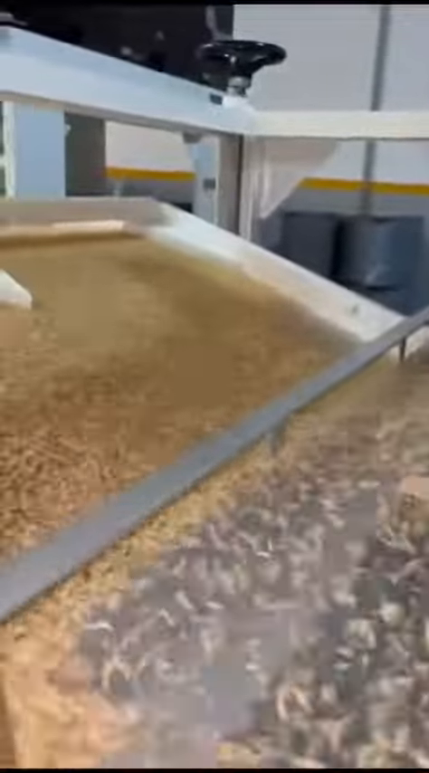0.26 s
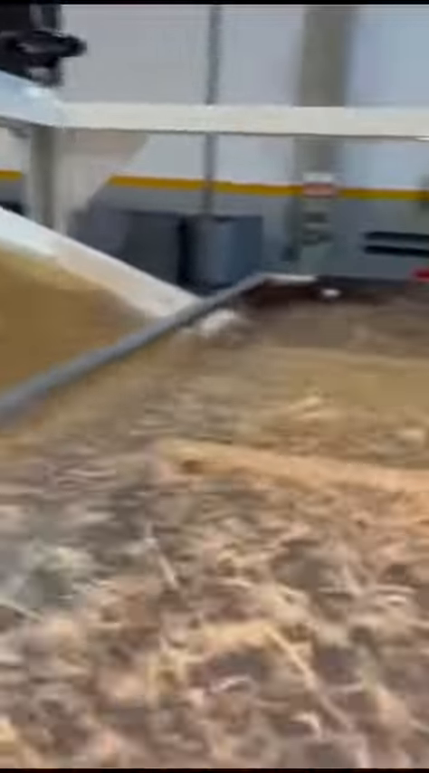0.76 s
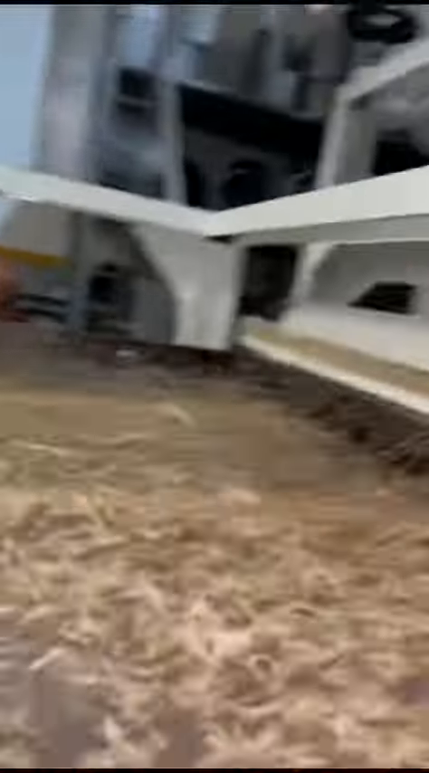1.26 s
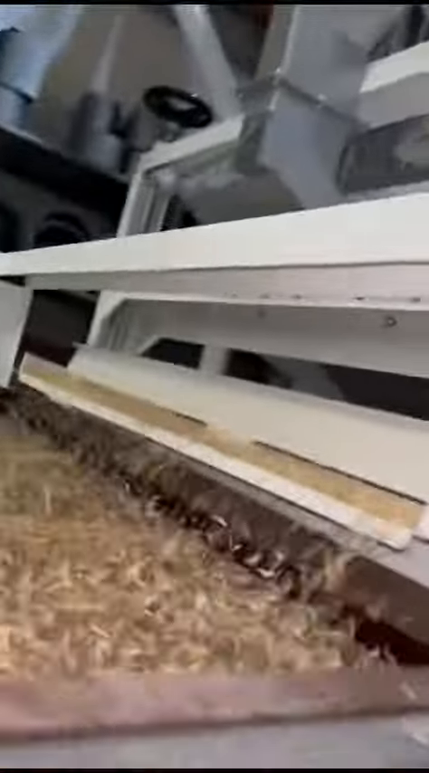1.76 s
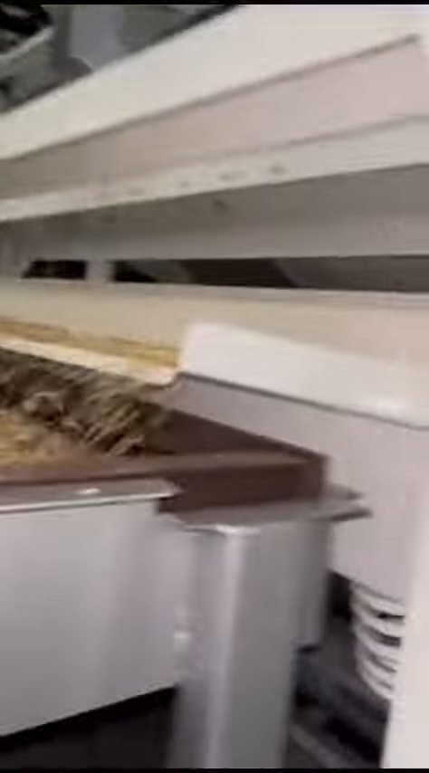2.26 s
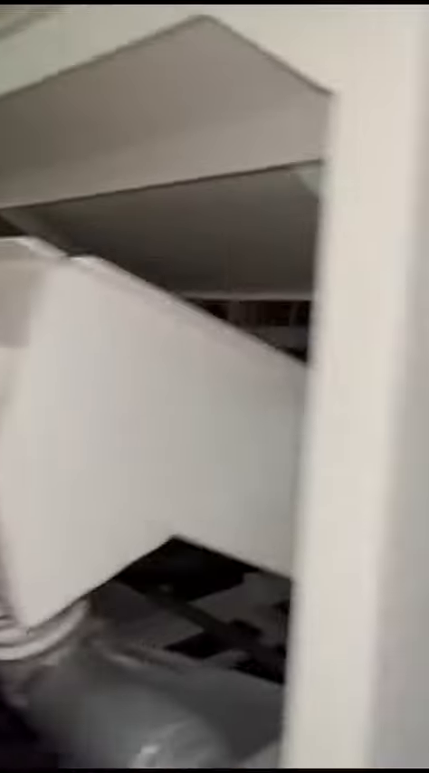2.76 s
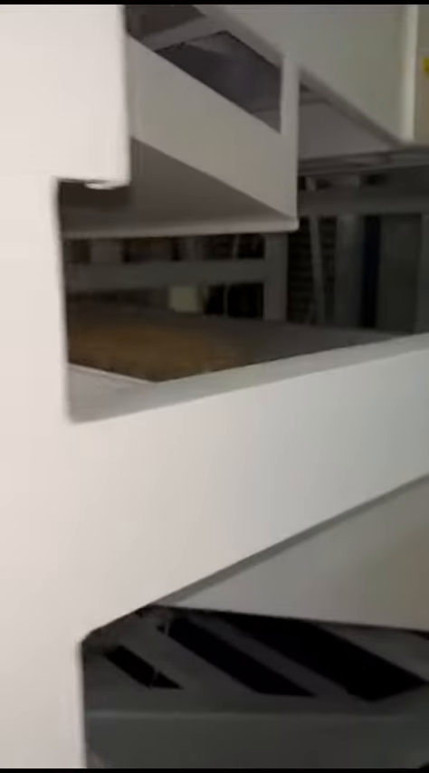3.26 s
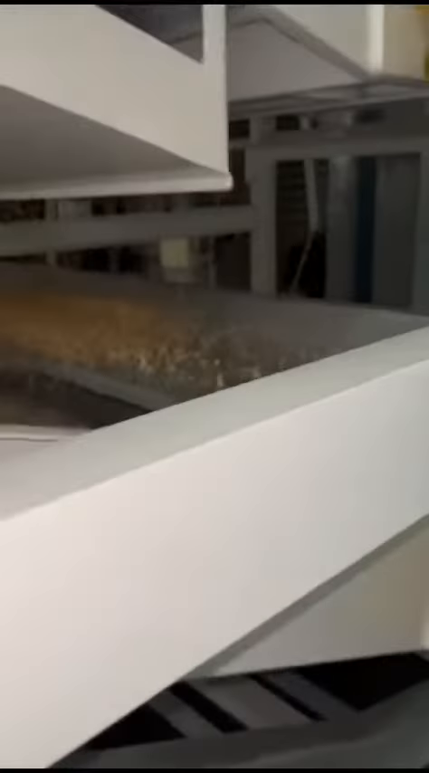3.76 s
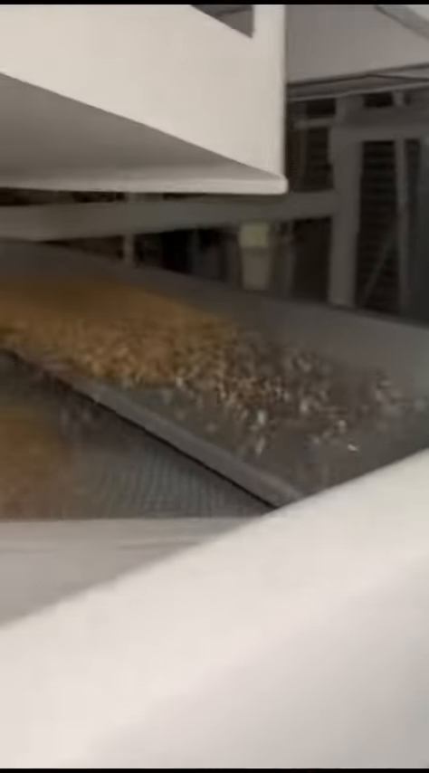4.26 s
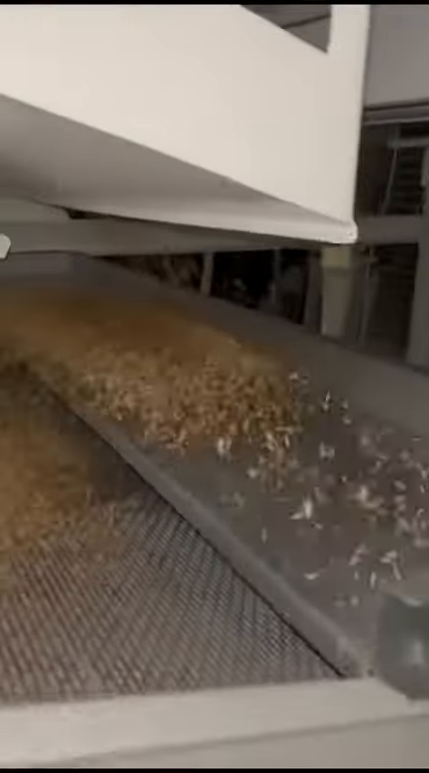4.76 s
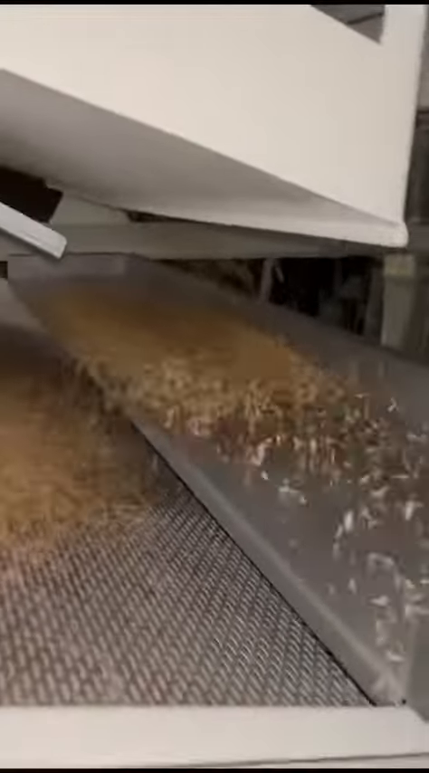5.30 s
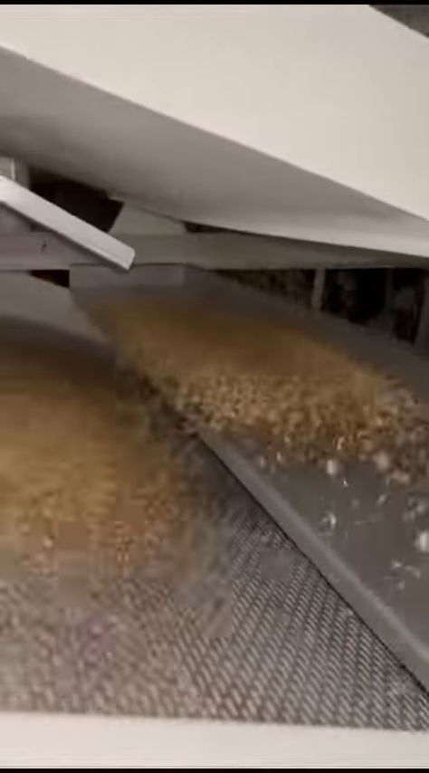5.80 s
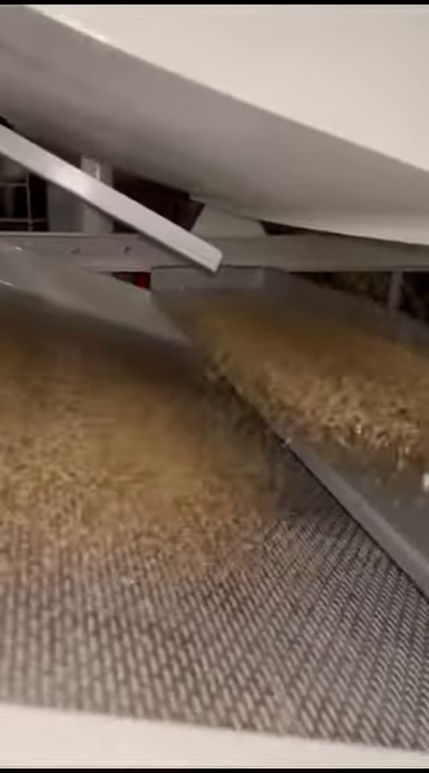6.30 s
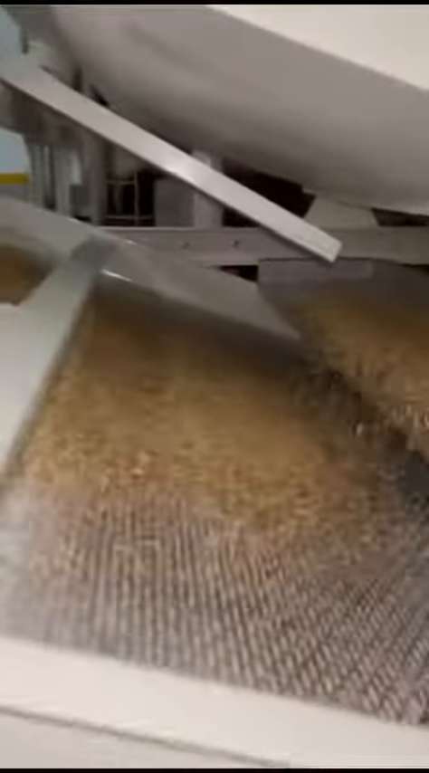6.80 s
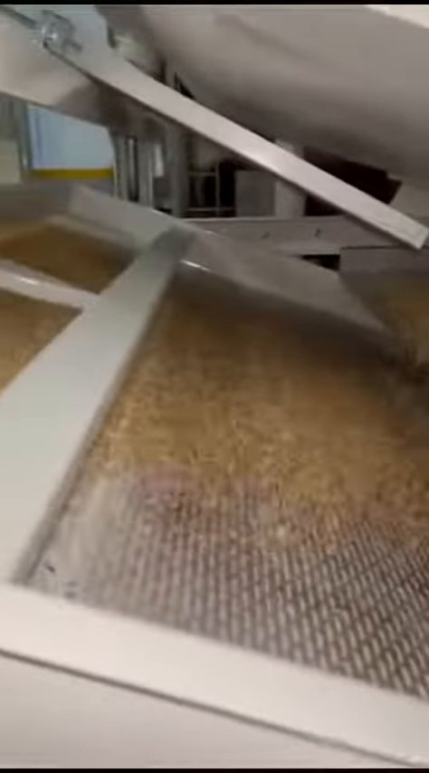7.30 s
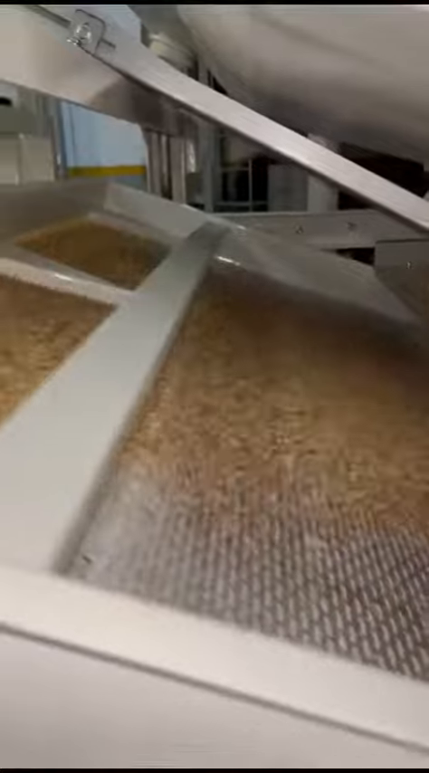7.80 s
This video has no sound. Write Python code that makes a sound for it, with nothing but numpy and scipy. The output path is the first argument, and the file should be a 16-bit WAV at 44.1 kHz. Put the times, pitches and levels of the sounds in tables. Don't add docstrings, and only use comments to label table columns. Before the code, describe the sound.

Continuous heavy machine noise, heard close by on a phone carried past vibrating decks. Kernels rain on wire mesh in a rapid shiver over a droning hum and boxy roar. Loose metal knocks cluster in the first second, then become sparse. The sound dips around the middle as the phone passes between decks, then fills out beside the lower screen, with short, dull rubbing groans from a belt.

```python
import sys
import numpy as np
from scipy import signal
from scipy.fft import rfft, irfft
from scipy.io import wavfile
from scipy.ndimage import uniform_filter1d

SR = 44100
rng = np.random.default_rng(int(sys.argv[2]) if len(sys.argv) > 2 else 0)


def generate_wav(sig):
    pcm = np.round(np.clip(np.atleast_2d(sig).T, -1, 1) * 32767).astype(np.int16)
    wavfile.write(sys.argv[1], SR, pcm)


def decibels_to_gain(level_db):
    exponent = np.asarray(level_db, float) / 20
    return 10 ** exponent


N = 355005
TIME = np.arange(N) / SR
FREQ = np.fft.rfftfreq(N, 1 / SR)

STROKE_HZ = 16.466
BELT_HZ, BELT_WIDTH_HZ = 637, 60

# time_s, third_multiple_db, seventh_multiple_db
STANDING_WAVES = [(0, -39, -40), (.8, -38, -40), (1.5, -52, -35), (2.0, -44, -37), (2.7, -43, -37),
                  (3.8, -52, -36), (4.5, -46, -32), (5.1, -53, -33), (6.3, -34, -36), (7.1, -34, -35),
                  (7.6, -36, -32), (8.05, -46, -32)]
# multiple, level_db, gain_over_open_mouth_db
STROKE_MULTIPLES = [(4, -5, 5), (5, 0, -3), (6, 1, 7), (8, 0, 2), (9, 1, 7), (10, -1, 0), (11, -3, 8),
                    (12, -6, 9), (13, -2, 0), (15, -3, 0), (18, -2, 3), (20, 0, 4), (22, -1, 4)]
# freq_hz, density_db
FRAME_SPECTRUM = [(26, -26), (45, -11), (70, -2), (110, 0), (170, 0), (240, -2), (330, -12), (500, -40)]
# freq_hz, density_db
HOLLOW_SPECTRUM = [(180, -30), (250, -6), (330, 0), (390, -.5), (450, -3), (495, -7), (530, -4.5),
                   (620, -12.5), (800, -22), (1100, -45)]
# freq_hz, density_db
PAN_SPECTRUM = [(450, -25), (650, -1), (900, 0), (1200, -3), (1500, -5.5), (1900, -6.5), (2500, -8.5),
                (3500, -16), (5500, -24), (8000, -40)]
# freq_hz, density_db
THROWN_SPECTRUM = [(1500, -30), (3000, -9), (4500, -5), (6500, -1), (9000, -3), (10400, -3.5), (13500, -8),
                   (15000, -9.5), (15700, -9.5), (15850, -50)]
# freq_hz, density_db
SLIDING_SPECTRUM = [(1000, -25), (2000, -5), (2800, 0), (3800, -1.5), (5300, .8), (6200, -6), (9000, -14),
                    (14000, -26), (15900, -50)]
# start_s, blow_db, low_modes_db, high_modes_db
KNOCKS = [(.056, -32, -3, -12), (.189, -28, -4, -10), (.285, -25.5, 9, -10), (.428, -33, -3, -10),
          (.610, -28, -9, -14), (.733, -26, -8, -7), (.784, -28, 5, -10), (.895, -32, -2, -12),
          (1.005, -33, -3, -12), (1.255, -33, -1, -9), (1.825, -35, -2, -10), (2.156, -34, 4, -8),
          (2.629, -34, -6, -4), (3.298, -27.5, 4, 0), (3.433, -36, 0, -8), (3.537, -31, 4, -7),
          (3.598, -33, 1, -5), (3.900, -34, 0, -6), (4.157, -33, 5, -8), (4.574, -33, 1, -3),
          (4.709, -34, 5, -7), (5.370, -35, 3, -8), (5.429, -32, 4, -7), (6.091, -34, 5, -8),
          (6.760, -35, 3, -8), (7.841, -35, 4, -8)]
# freq_hz, width_hz
LOW_MODES = [(570, 70), (880, 100), (1090, 90)]
# freq_hz, width_hz
MID_MODES = [(1720, 110), (1900, 130), (2100, 120), (2380, 140)]
# freq_hz, width_hz
HIGH_MODES = [(2950, 300), (3700, 350), (4250, 350), (4900, 500)]
# start_s, groan_db, hold_s
GROANS = [(2.2, -35.5, .05), (2.83, -35, .05), (3.31, -37, .02), (3.55, -35, .1), (4.1, -36.5, .12),
          (4.58, -36, .02), (4.71, -34.5, .04), (5.36, -34.5, .08), (5.5, -37, .02), (6.0, -33.5, .02),
          (6.1, -33.5, .02), (6.6, -37, .12), (6.75, -35, .06), (7.27, -35, .05), (7.54, -40, .03),
          (8.03, -35, .03)]
# time_s, upper_deck_distance_m, lower_deck_distance_m
PHONE_PATH = [(0, .95, 5), (1.0, 1.05, 4.5), (1.85, 1.15, 4), (2.5, 1.7, 3), (3.15, 2.3, 2.3),
              (3.55, 2.6, 1.6), (3.95, 3.5, 1.6), (4.6, 4, 1.2), (5.5, 4.5, 1.08), (6.3, 5, 1.08),
              (6.7, 5, .95), (7.3, 5, .98), (8.05, 5, .9)]
# rumble_db, hollow_db, rattle_db, sliding_grain_db, thrown_grain_db, throw_depth_db
UPPER_DECK = (-27.6, -25.2, -33.6, -34.6, -40.3, 3.7)
# rumble_db, hollow_db, rattle_db, sliding_grain_db, thrown_grain_db, throw_depth_db
LOWER_DECK = (-27, -25.5, -37.3, -35.3, -37.6, 3.1)
# rumble_db, hollow_db, rattle_db, sliding_grain_db, thrown_grain_db,
# throw_depth_db
MOUTH_GAIN = (.8, 6.9, 1.8, -.2, -.3, .5)
# freq_hz, likeness_0_to_1, right_lead_rad
PORT_LIKENESS = [(0, 1, 0), (150, .998, .17), (500, .96, .85), (900, .8, .75), (1750, .95, 0),
                 (2400, .7, -2.0), (3000, .35, -1.6), (4000, .3, .4), (4700, .25, 3.0), (5200, .45, 4.0),
                 (5900, .97, 3.14)]
# freq_hz, left_minus_right_db
PORT_BALANCE = [(200, .3), (600, -.3), (1100, -2), (1800, -.6), (3200, -1.6), (4500, -.6), (6000, 0)]
# time_s, left_minus_right_db
PHONE_TURN = [
    (0.0, -0.9),
    (1, -.7),
    (2.7, .2),
    (4.5, 0.5),
    (8.05, 0.2),
]


def unit(x):
    return x / np.sqrt(np.mean(x ** 2))


def over_time(table):
    s, *columns = np.transpose(table)
    return [np.interp(TIME, s, column) for column in columns]


def noise():
    return rng.standard_normal((2, N))


def colour(x, spectrum):
    hz, db = np.transpose(spectrum)
    gain = decibels_to_gain(np.interp(np.log(FREQ + 1), np.log(hz), db, -90, -90))
    return unit(irfft(rfft(x) * gain, N))


def ring(x, hz, width_hz):
    return signal.lfilter(*signal.iirpeak(hz, hz / width_hz, fs=SR), x)


def wander(rate_hz):
    k = int(SR / rate_hz)
    held = rng.standard_normal(size=512)[np.arange(N) // k]
    return unit(uniform_filter1d(uniform_filter1d(held, k), k))


def mouth():
    return np.clip(1 - (TIME - .8) / .55, 0, 1)


def levels_at_phone():
    upper_m, lower_m = np.maximum(over_time(PHONE_PATH), .3)
    upper = np.array(UPPER_DECK)[:, None] + np.array(MOUTH_GAIN)[:, None] * mouth()
    lower = np.array(LOWER_DECK)[:, None]
    upper_power = (decibels_to_gain(upper[:-1]) / upper_m) ** 2
    lower_power = (decibels_to_gain(lower[:-1]) / lower_m) ** 2
    share = upper_power[-1] / (upper_power[-1] + lower_power[-1])
    blur_db = 1.5 * share * (1 - share) / .25
    depth_db = share * upper[-1] + (1 - share) * lower[-1] - blur_db
    return *(10 * np.log10(upper_power + lower_power)), depth_db


def splice_db():
    s, db, hold_s = np.transpose(GROANS)[:, :, None]
    rise_db_s, fall_db_s, slack_db = 150, 110, -45
    below_db = rise_db_s * np.maximum(s - TIME, 0) + fall_db_s * np.maximum(TIME - s - hold_s, 0)
    return np.maximum((db - below_db).max(axis=0), slack_db)


def hum():
    third_db, seventh_db = over_time(STANDING_WAVES)
    turn = 2 * np.pi * STROKE_HZ * TIME
    out = decibels_to_gain(third_db - 1) * np.cos(3 * turn + wander(3) / 4)
    out = out + decibels_to_gain(seventh_db - 2) * np.cos(7 * turn - 2.5 + wander(2) / 3)
    over = mouth()
    for k, db, mouth_db in STROKE_MULTIPLES:
        level = decibels_to_gain(-44 + db + mouth_db * over + 3.0 * wander(1.2))
        phase = rng.uniform(0, 2 * np.pi) + .4 * wander(1.1)
        out = out + level * np.cos(round(k) * turn + phase)
    return np.sqrt(2) * out


def decks(rumble_db, hollow_db, rattle_db):
    jump_db = .6 * np.cos(2 * np.pi * STROKE_HZ * TIME - .4) + .7 * wander(9)
    drag_db = .11 * (uniform_filter1d(splice_db(), size=2000) + 41)
    rumble = decibels_to_gain(rumble_db - 1.8) * colour(noise(), FRAME_SPECTRUM)
    hollow = decibels_to_gain(hollow_db - .1 + .4 * wander(12)) * colour(noise(), HOLLOW_SPECTRUM)
    pan_db = .9 * (rattle_db + 32) - 7 + 2.5 * wander(13)
    pan = decibels_to_gain(pan_db) * unit(ring(noise(), 1780, 600))
    clatter = colour(noise(), PAN_SPECTRUM) + pan
    return rumble + hollow + decibels_to_gain(rattle_db + 1.3 + jump_db + drag_db) * clatter


def grain(flow_db, thrown_db, depth_db):
    turn = 2 * np.pi * STROKE_HZ * TIME + .15 + .15 * wander(9)
    throw_db = depth_db * (np.cos(turn) + .27 * np.cos(2 * turn + .9))
    landing = decibels_to_gain(1.22 * throw_db * (1 + .25 * wander(10)) + .25 * wander(22))
    struck = rng.random((2, N)) < .05
    ticks = struck * decibels_to_gain(1.5 * rng.exponential(size=(2, N))) * noise()
    shower = unit(landing) * colour(noise() + .3 * unit(ticks), THROWN_SPECTRUM)
    mesh = decibels_to_gain(-19) * unit(ring(noise(), 7410, 150))
    unsteady_db = .2 * throw_db + .7 * wander(5) + .9 * wander(12)
    flow = decibels_to_gain(unsteady_db) * colour(noise(), SLIDING_SPECTRUM)
    return decibels_to_gain(thrown_db) * (shower + mesh) + decibels_to_gain(flow_db) * flow


def knocks():
    size, bounce_s = SR // 8, .035
    out = np.zeros((2, N + size))
    fade = np.exp(-np.log(1000) * (TIME[:size] / bounce_s) ** 2)
    for s, db, low_db, high_db in KNOCKS:
        blow = rng.standard_normal((2, size)) * fade
        blow[:, 0] += 8.0
        hit = 0
        for modes, group_db in ((LOW_MODES, low_db), (MID_MODES, 0), (HIGH_MODES, high_db)):
            for hz, width_hz in modes:
                level = decibels_to_gain(group_db + 1.8 * rng.standard_normal())
                hit = hit + level * unit(ring(ring(blow, hz, 2 * width_hz), hz, width_hz))
        start = int(s * SR)
        out[:, start:start + size] += decibels_to_gain(db) * hit / hit[:, :size // 8].std(axis=1, keepdims=True)
    return out[:, :N]


def belt():
    pitch_hz = BELT_HZ * (1 + .022 * wander(30))
    tone = np.sqrt(2) * np.cos(2 * np.pi * np.cumsum(pitch_hz) / SR)
    rub = unit(ring(ring(noise(), BELT_HZ, BELT_WIDTH_HZ), BELT_HZ, BELT_WIDTH_HZ))
    return (.75 * tone + .65 * rub) * decibels_to_gain(1.6 * (splice_db() + 34) - 32.5)


def scene():
    rumble_db, hollow_db, rattle_db, flow_db, thrown_db, depth_db = levels_at_phone()
    steel = decks(rumble_db, hollow_db, rattle_db)
    flow_drop_db = .22 * (rattle_db + 38)
    kernels = grain(flow_db - .3 - flow_drop_db, thrown_db + 3.8, depth_db)
    return hum() + steel + kernels + knocks() + belt()


def roll_off(x):
    return signal.sosfilt(signal.butter(12, 15910, fs=SR, output="sos"), x)


def record(dry):
    hz, like, lead = np.transpose(PORT_LIKENESS)
    like = np.clip(np.interp(FREQ, hz, like), 0, 1)
    lag_s = 1 / 4400
    lead = np.interp(FREQ, hz, lead) - 2 * np.pi * lag_s * np.maximum(FREQ - hz[-1], 0)
    tilt = decibels_to_gain(np.interp(FREQ, *np.transpose(PORT_BALANCE)) / 2)
    near, other = rfft(dry)
    left = near * tilt
    right = (like * near * np.exp(1j * lead) + np.sqrt(1 - like ** 2) * other) / tilt
    turn_db = over_time(PHONE_TURN)[0] / 2
    mix = irfft(np.array([left, right]), N) * decibels_to_gain(np.array([turn_db, -turn_db]))
    return roll_off(mix)


dry = scene()
out = record(dry)
generate_wav(out)
```